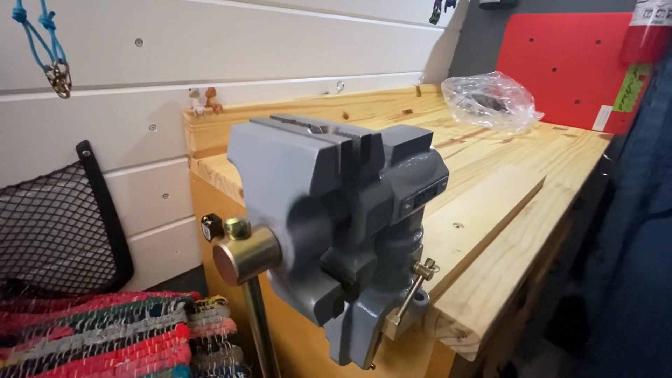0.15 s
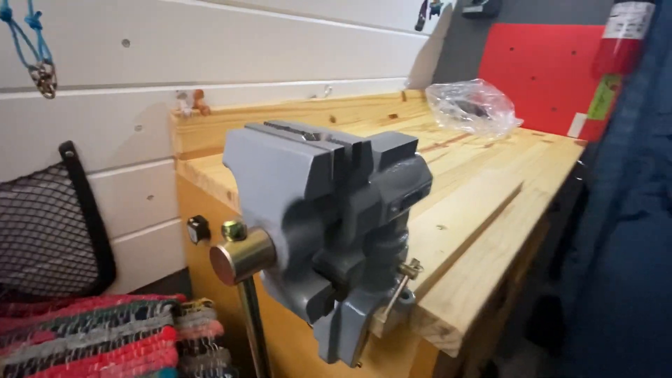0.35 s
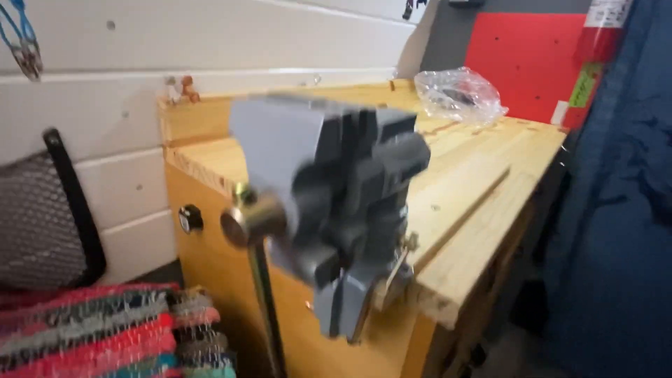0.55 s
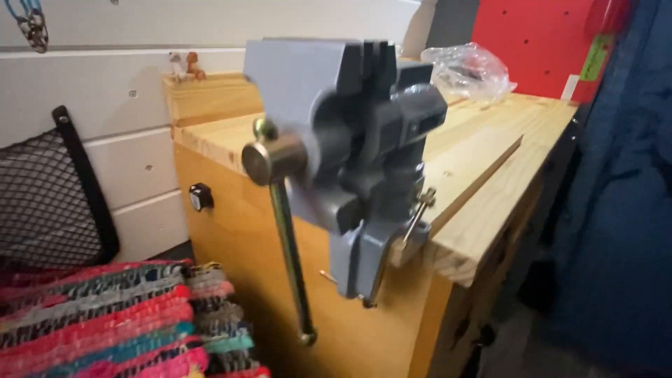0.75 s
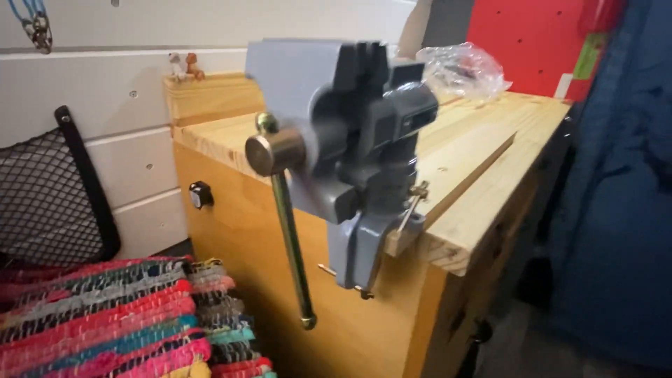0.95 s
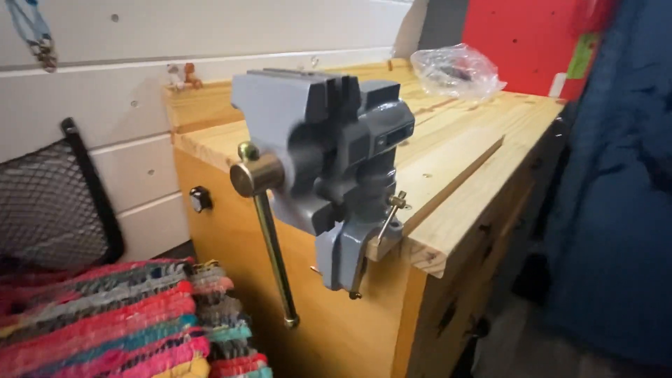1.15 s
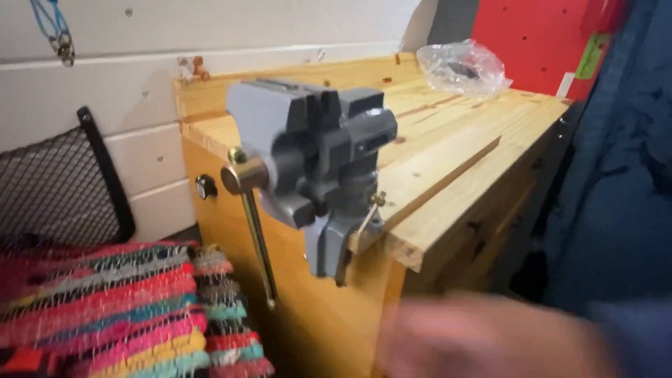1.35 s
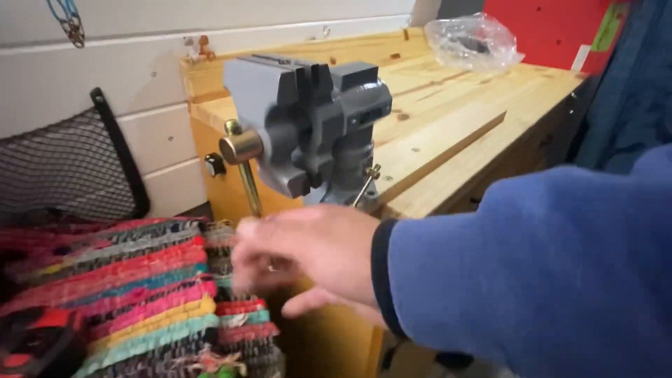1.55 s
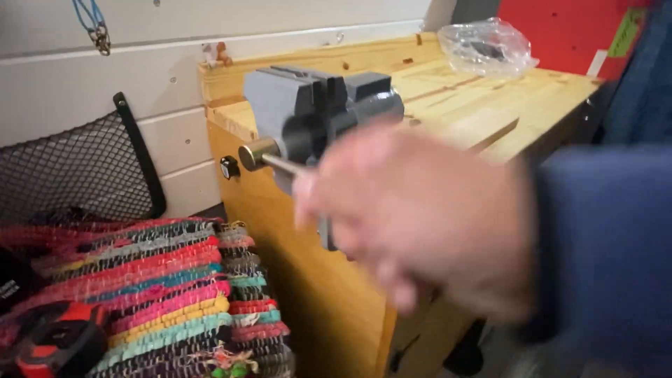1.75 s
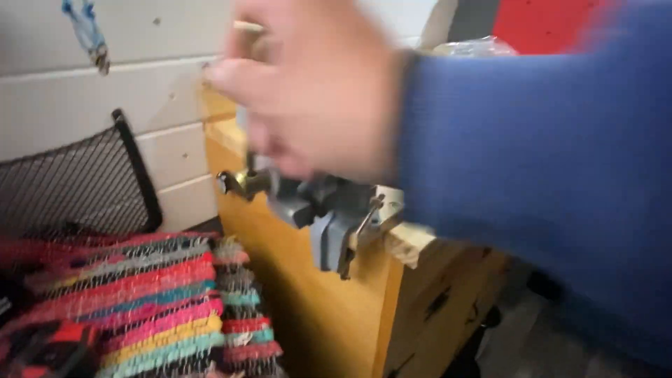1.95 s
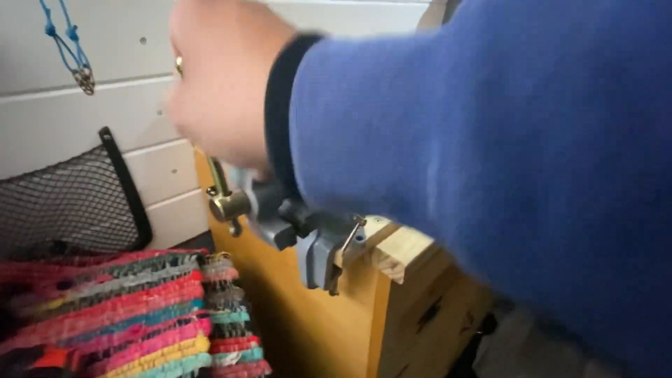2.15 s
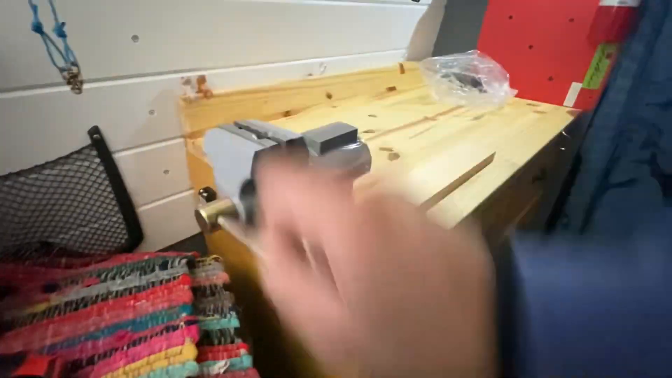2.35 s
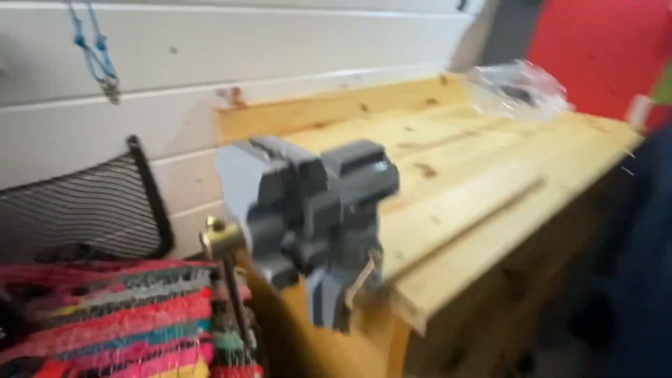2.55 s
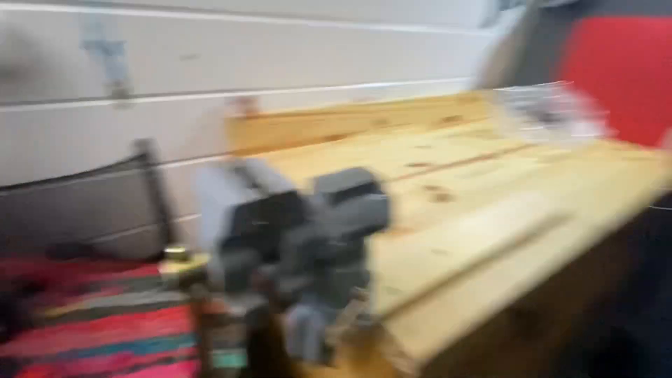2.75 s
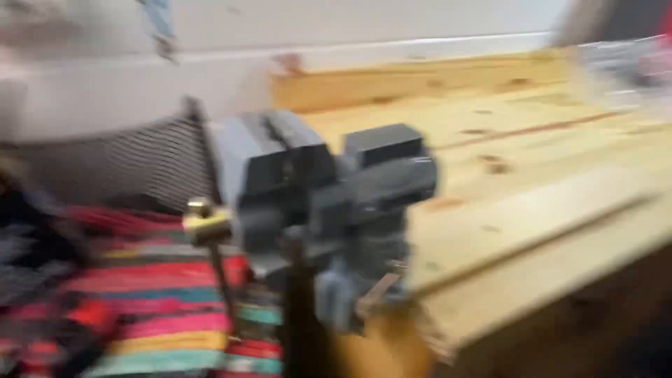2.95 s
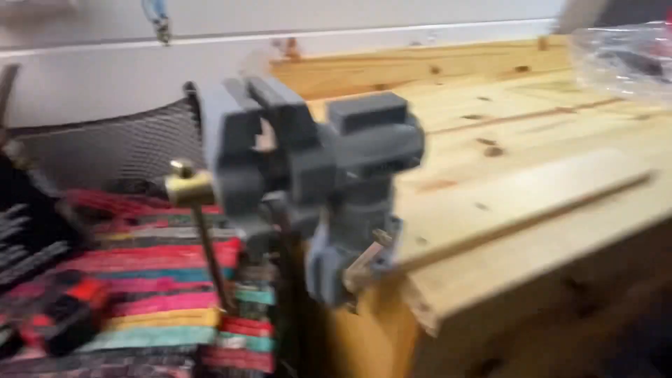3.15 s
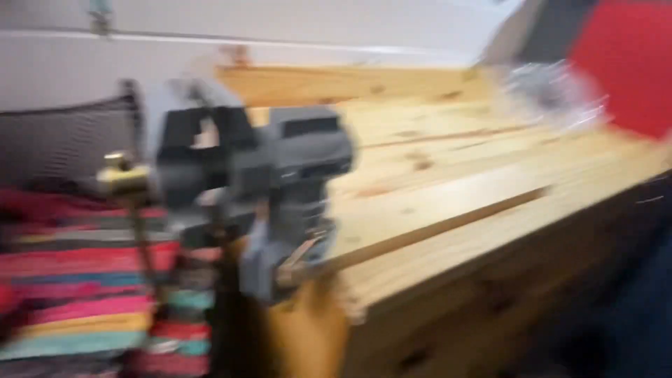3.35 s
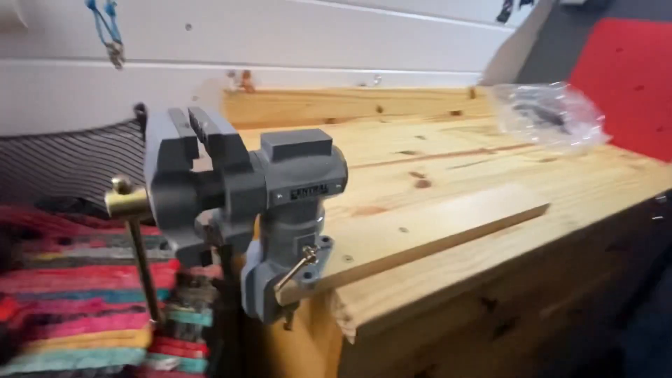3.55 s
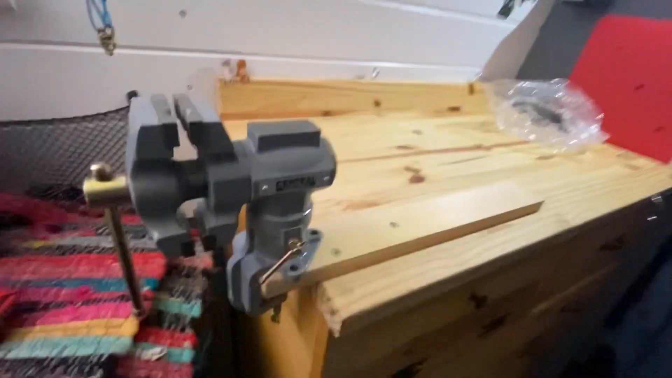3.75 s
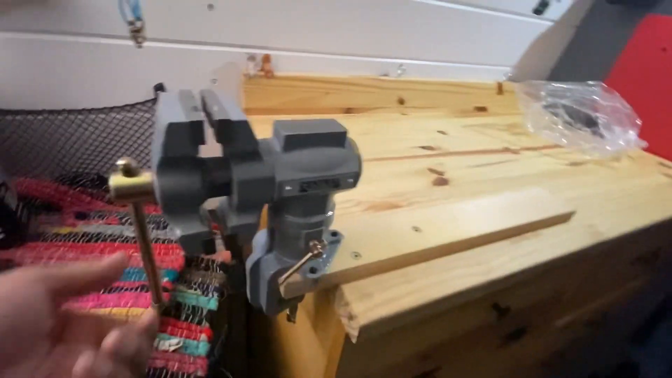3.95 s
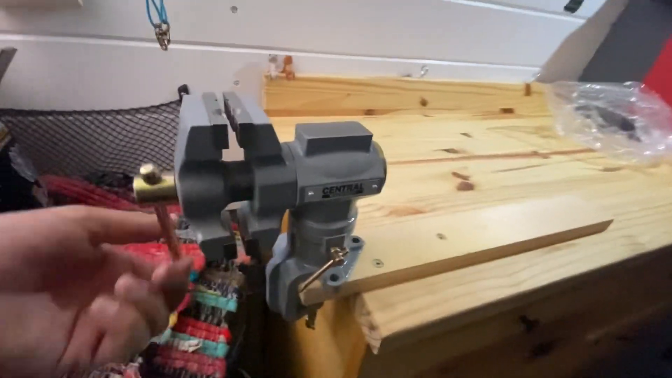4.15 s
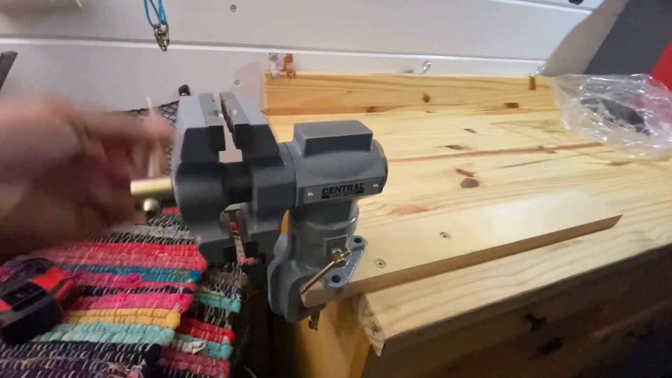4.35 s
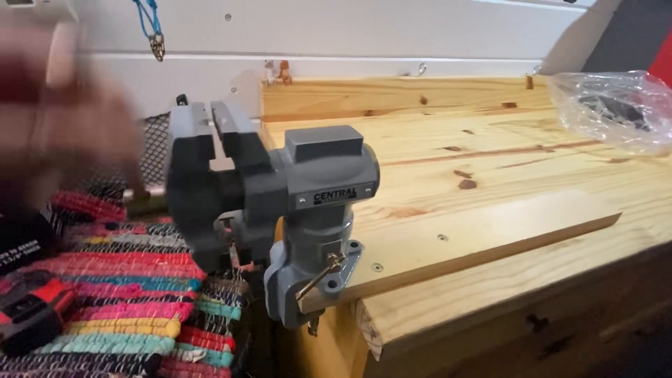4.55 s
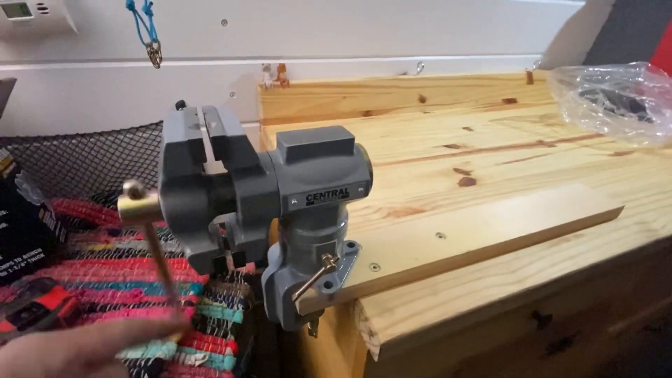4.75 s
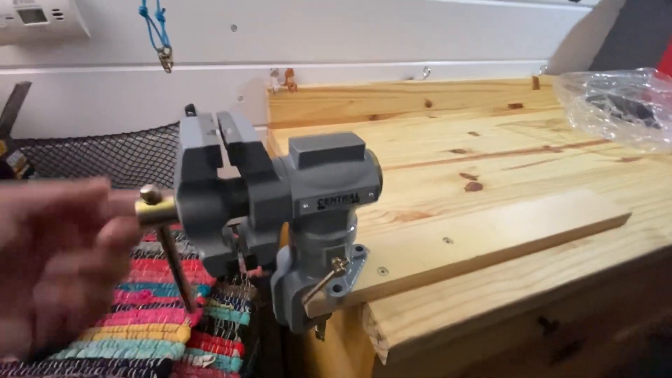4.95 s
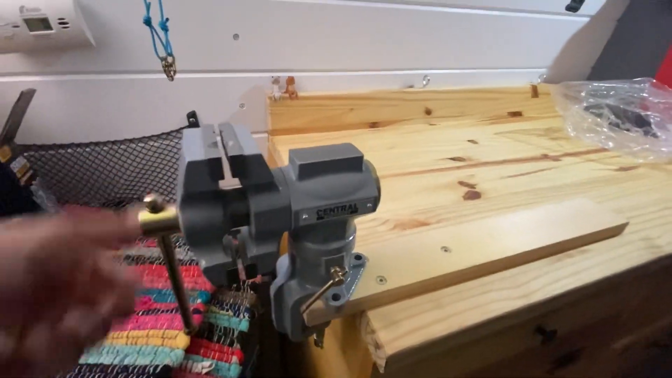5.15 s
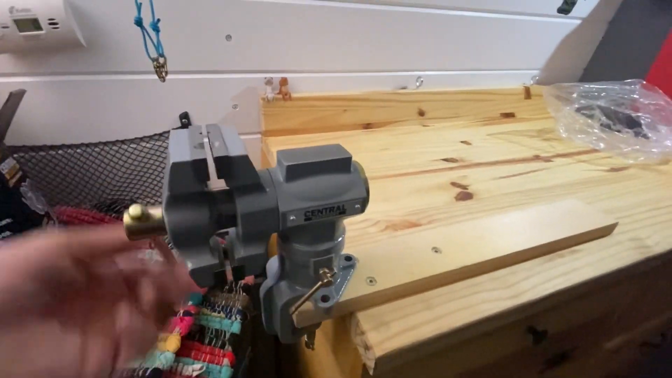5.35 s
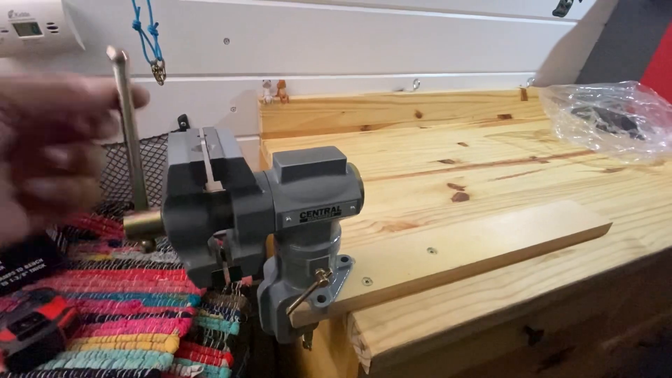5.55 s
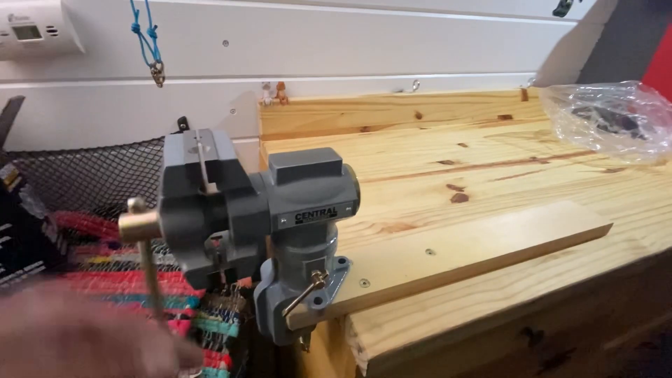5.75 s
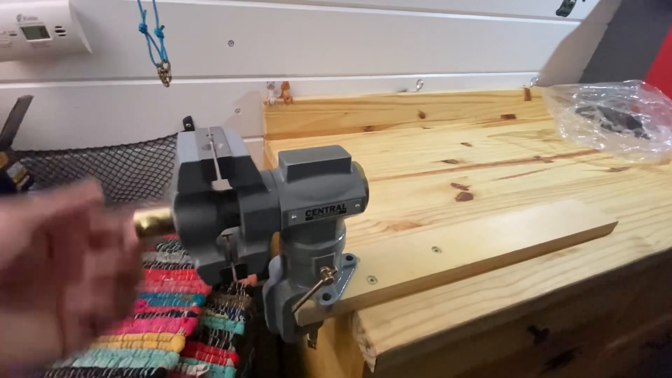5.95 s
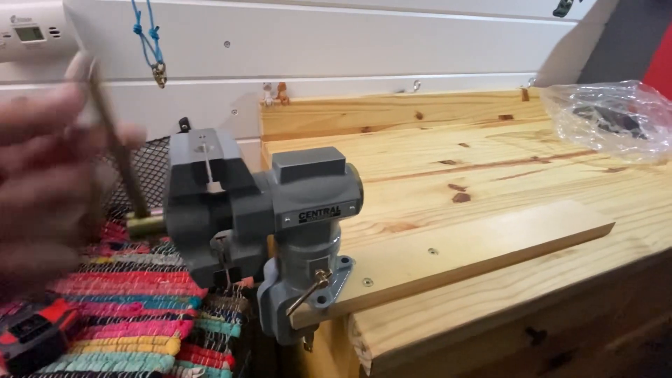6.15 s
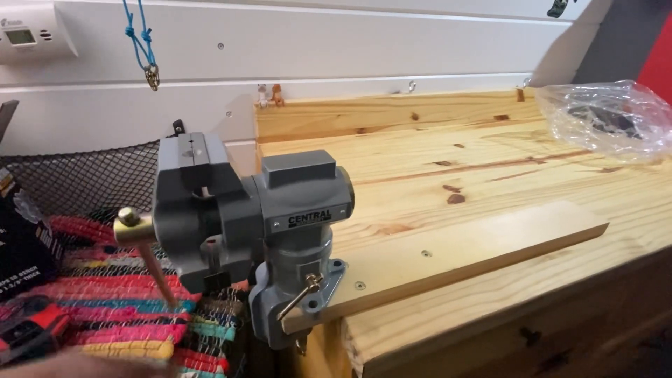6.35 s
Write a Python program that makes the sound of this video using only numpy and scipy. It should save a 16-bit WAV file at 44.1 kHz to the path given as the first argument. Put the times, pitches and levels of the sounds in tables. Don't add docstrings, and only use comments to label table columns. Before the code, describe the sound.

Close stereo pickup of a heavy bench vise being handled. A dull thump and light metal tick lead to a hard ringing clack as the bar falls through its collar. Soft bumps and cloth movement follow, then irregular clinks and wooden knocks as the screw is turned. Rings die almost at once; a low rumble and thin hiss lie underneath in a small room.

```python
import sys
import numpy as np
from scipy import signal
from scipy.fft import rfft, irfft, next_fast_len
from scipy.io import wavfile
from scipy.ndimage import uniform_filter1d

SR = 44100
rng = np.random.default_rng(int(sys.argv[2]) if len(sys.argv) > 2 else 0)


def decibels_to_gain(level_db):
    exponent = np.asarray(level_db, float) / 20
    return 10 ** exponent


def materialize(psi):
    bounded = np.clip(np.atleast_2d(psi).T, -1, 1)
    quanta = np.round(bounded * 32767).astype(np.int16)
    wavfile.write(sys.argv[1], SR, quanta)


N = 281835
LEFT_LAG = 17

# start in seconds, then levels in dB of the first, collar, high and top rings.
CLINKS = [(1.551, -68, -43, -72, -87.5), (1.561, -56, -54, -51.5, -83), (2.1355, -76, -54, -61, -84),
          (2.1459, -74, -55, -80, -83), (2.189, -67.5, -50.5, -59.5, -66), (2.3476, -29, -28, -10, -19.5),
          (2.3504, -40.5, -33.5, -17.5, -23), (2.3972, -47, -43, -49.5, -62), (4.011, -57.5, -71, -73, -85),
          (4.0263, -55, -41, -46.5, -75), (4.5977, -45, -47, -54, -68.5), (4.6638, -77.5, -56, -77, -72),
          (4.748, -72.5, -57.5, -88.5, -95), (4.8675, -35.5, -49, -53.5, -56),
          (4.8814, -39, -35.5, -44, -53), (5.268, -84.5, -56, -92.5, -89), (5.2924, -27, -33.5, -19, -61.5),
          (5.3, -31, -39.5, -31, -45.5), (5.6376, -56.5, -61, -82, -92), (5.6604, -63, -58, -79, -82.5),
          (5.698, -44.5, -43, -45, -59), (5.9141, -54, -40, -40.5, -37), (5.9222, -41.5, -34, -35, -42),
          (6.1118, -65, -61, -97, -107), (6.215, -62, -57.5, -66.5, -82.5)]
# start in seconds, level in dB.
BALL_BLOWS = [
    (2.349, -45.5),
    (4.8815, -58),
    (5.2976, -29),
    (5.698, -60),
    (5.9147, -47),
]
# frequency in Hz, level in dB, 60 dB decay in seconds,
# left-right balance in dB.
LOW_RING = [(5400, -20, .06, -8), (5725, 0, .135, -8), (5800, -13, .1, -8)]
COLLAR_RING = [(4450, -14, .04, -4), (6305, -2, .05, -5), (6660, -2, .08, -5), (6920, -6, .06, -5),
               (7250, -6, .05, -4)]
MIDDLE_RING = [(8330, -6, .08, -3), (8470, -5, .1, -3), (8590, 0, .08, -3)]
HIGH_RING = [(10720, -13, .04, 0), (11160, 0, .075, -2), (11400, -10, .08, -2), (11770, -21, .05, 0)]
TOP_RING = [(13140, 0, .08, 0), (14760, -12, .04, 0)]
BALL_RING = [(13880, 0, .075, 0), (13960, -14, .06, 0)]


def handle():
    s, low_db, collar_db, high_db, top_db = np.transpose(CLINKS)
    middle_db = 0.33 * collar_db + 0.38 * high_db + 0.15 * top_db - 15
    out = ringing(s, low_db + 5, LOW_RING, rise_s=0.0006, free=0.22, grip_s=0.011, chatter=0.22, soft=2.5)
    out += ringing(s, collar_db + 3, COLLAR_RING, rise_s=0.0012, free=0.47, grip_s=0.0028, chatter=0.53,
                   soft=0.96)
    out += ringing(s, middle_db + 10.5, MIDDLE_RING, rise_s=0.0028, free=0.37, grip_s=0.012, chatter=0.7)
    out += ringing(s, high_db + 10, HIGH_RING, rise_s=0.0012, free=0.02, grip_s=0.0041, chatter=0.31,
                   soft=-2.6)
    out += ringing(s, top_db + 7, TOP_RING, rise_s=0.002, free=0.15, grip_s=0.006, chatter=0.4)
    ball_s, ball_db = np.transpose(BALL_BLOWS)
    out += ringing(ball_s, ball_db, BALL_RING, rise_s=0.0013, free=0.4, grip_s=0.012, chatter=0.3)
    bright = signal.butter(2, [3000, 14000], "band", fs=SR, output="sos")
    crack = signal.sosfilt(bright, contact(s, (collar_db + top_db) / 2 + 19, 0.00079))
    rattle = signal.sosfilt(bright, [contact(s, collar_db + 9.5, 0.00906), contact(s, collar_db + 11, 0.009)])
    thin = signal.butter(2, [5200, 15800], "band", fs=SR, output="sos")
    shiver = signal.sosfilt(thin, contact(s, (high_db + top_db) / 2 + 4, 0.017))
    return out + snaps() + shiver + rattle + [decibels_to_gain(-3) * np.roll(crack, LEFT_LAG), crack]


def ringing(times, levels_db, modes, rise_s, free, grip_s, chatter, soft=3):
    out, age = np.zeros((2, N + SR)), np.arange(SR // 2) / SR
    shake = rms_one(uniform_filter1d(rng.standard_normal(N + SR), size=60))
    for s, blow_db, luck in zip(times, levels_db, rng.standard_normal((len(times), len(modes), 3))):
        firm = min(decibels_to_gain(0.15 * (blow_db + 30)), 1)
        loose = np.clip(free * firm ** soft, 0, 1)
        at = int(s * SR)
        for (hz, level_db, t60, lean_db), (phase, extra_db, detune) in zip(modes, luck):
            alive = age[:int(min(1.2 * t60, 0.49) * SR)]
            decay_db = 60 * alive / t60 / np.sqrt(firm)
            swing = (1 - np.exp(-alive * firm / rise_s)) ** 2
            swing = swing * decibels_to_gain(blow_db + level_db + extra_db - decay_db)
            swing = swing * (loose + (1 - loose) * np.exp(-alive / grip_s))
            start = at + int(hz)
            swing = swing * (1 + chatter / np.sqrt(firm) * shake[start:start + len(alive)])
            turns = 2 * np.pi * hz * (1 + 0.002 * detune) * alive + 10 * phase
            trail = 0.72 + (hz < 9500) * detune
            out[0, at:at + len(alive)] += decibels_to_gain(lean_db / 2) * swing * np.sin(turns - trail)
            out[1, at:at + len(alive)] += decibels_to_gain(-lean_db / 2) * swing * np.sin(turns)
    return out[:, :N]


# start in seconds, peak level in dB.
SNAPS = [(1.56, -41), (2.3495, -18.5), (4.0283, -39), (4.0336, -53), (4.5997, -44), (4.8825, -29.5),
         (5.2947, -22), (5.699, -36), (5.9142, -23), (5.9184, -29), (6.215, -52)]


def snaps():
    s, peak_db = np.transpose(SNAPS)
    force = np.zeros(N)
    force[(s * SR).astype(int)] = decibels_to_gain(peak_db + 8) * rng.choice([-1, 1], len(s))
    bright = signal.butter(2, [3600, 13500], "band", fs=SR, output="sos")
    pulse = signal.sosfilt(bright, force + 1e-18)
    return np.array([decibels_to_gain(-2.5) * np.roll(pulse, 3), pulse])


# start in seconds, dull level in dB, hard level in dB,
# length of contact in seconds.
KNOCKS = [(1.552, -40, -46, 0.0022), (1.559, -40, -40.5, 0.0042), (1.609, -48, -53, 0.0073),
          (2.126, -43.5, -48, 0.0058), (2.143, -55, -46, 0.0038), (2.188, -38.5, -37.5, 0.0048),
          (2.206, -42, -47, 0.0022), (2.348, -30, -24.5, 0.0032), (2.354, -40, -36.5, 0.015),
          (2.402, -37, -42, 0.003), (3.269, -46, -54.5, 0.0011), (4.012, -48.5, -50, 0.018),
          (4.028, -55, -43, .001), (4.033, -48.5, -43, 0.0043), (4.501, -63, -80, 0.004),
          (4.597, -45.5, -40.5, 0.0028), (4.606, -43.5, -54, 0.015), (4.701, -47, -61, 0.0037),
          (4.729, -45.5, -55, 0.0033), (4.745, -66, -49, 0.0049), (4.873, -44, -43, 0.0042),
          (4.885, -49.5, -39, 0.0036), (5.293, -39, -32.5, 0.0051), (5.304, -35, -47.5, 0.015),
          (5.36, -48.5, -49, 0.0041), (5.585, -52.5, -56.5, 0.0022), (5.64, -53.5, -51, 0.0047),
          (5.697, -37, -32.5, 0.0035), (5.705, -42.5, -43.5, 0.02), (5.806, -67, -71, 0.003),
          (5.914, -37.5, -35.5, 0.005), (5.927, -39, -38, 0.0052), (5.97, -40.5, -39, 0.0018),
          (6.115, -55.5, -69, 0.0033), (6.214, -58.5, -44.5, .002), (6.222, -42.5, -49, 0.0085),
          (6.273, -51.5, -55.5, 0.0054)]
# frequency in Hz, level in dB, 60 dB decay in seconds,
# left-right balance in dB.
BODY = [(527.3, -4, 0.039, -3), (757, 4.5, 0.014, -4.5), (1057, -1.5, 0.023, -9), (1340, 3.5, 0.011, -4.5)]
JAWS = [(1635, -6, 0.033, 0), (2012, 0.5, 0.011, 7.5), (2310, -2.5, 0.01, 4), (2840, -5, 0.012, -3.5),
        (3310, -3, 0.0063, -8.5), (4360, 4, 0.0042, -8.5)]


def casting():
    s, dull_db, hard_db, spread_s = np.transpose(KNOCKS)
    shared = struck(contact(s, dull_db - 4.5, spread_s), BODY)
    shared += struck(contact(s, hard_db - 3.5, 2.1 * spread_s), JAWS)
    shared += struck(contact(s, dull_db - 17.5, 2.2 * spread_s), BENCH + DRAWER[:2])
    apart = struck(contact(s, dull_db - 5, 3 * spread_s), BODY + JAWS[:3])[1]
    return shared + apart * decibels_to_gain(np.array([[-3], [0]])) + lever()


# start in seconds, lower pair in dB, upper pair in dB,
# rise in seconds.
LEVER_TAPS = [
    (5.9545, -70, -95, .004),
    (5.971, -78, -66, .004),
    (6.05, -74, -90, .02),
    (6.31, -72, -95, .03),
]
# frequency in Hz, level in dB, 60 dB decay in seconds, left-right balance in dB.
LEVER = [(2010, -3, .7, 4), (2083, 0, .8, 4), (3285, -2, .35, -2), (3360, 0, .35, -2)]


def lever():
    out, age = np.zeros((2, N + SR)), np.arange(SR // 2) / SR
    for s, lower_db, upper_db, rise_s in LEVER_TAPS:
        at = int(s * SR)
        for k, (hz, level_db, t60, lean_db) in enumerate(LEVER):
            pair_db = (lower_db, upper_db)[k // 2]
            swing = (1 - np.exp(-age / rise_s)) * decibels_to_gain(pair_db + level_db - 60 * age / t60)
            waver = rms_one(uniform_filter1d(rng.standard_normal(len(age)), size=300))
            tone = swing * (1 + 0.5 * waver) * np.sin(2 * np.pi * hz * age + rng.uniform(0, 2 * np.pi))
            out[:, at:at + len(age)] += decibels_to_gain(np.array([[0.5], [-0.5]]) * lean_db) * tone
    return out[:, :N]


# time of the peak in seconds, peak level in dB, rise in
# seconds, fall in seconds, tightness in dB.
EFFORTS = [(1.578, -42.5, 0.027, 0.15, -9), (2.146, -58.5, .09, 0.071, -6),
           (2.207, -40.5, 0.055, 0.067, -2), (2.367, -30.5, 0.027, 0.088, -11),
           (3.271, -61, 0.035, 0.1, -0.5), (4.034, -58, 0.03, 0.12, -4), (4.279, -56, 0.069, 0.11, -9),
           (4.345, -57.5, 0.035, 0.2, -3), (4.508, -51, .015, 0.053, -2), (4.621, -46, 0.053, 0.066, -15),
           (4.715, -45, 0.054, 0.073, -4), (4.891, -52, .04, 0.075, -7.5), (5.312, -53, 0.0095, 0.33, -5),
           (5.434, -53, 0.12, 0.099, -32), (5.596, -48, 0.12, 0.031, -18), (5.768, -40.5, 0.091, 0.063, -9),
           (5.927, -38, 0.0079, 0.098, -9), (6.16, -57, 0.074, 0.091, -13), (6.275, -49, 0.11, 0.12, -6)]
# frequency in Hz, level in dB,
# 60 dB decay in seconds, left-right balance in dB.
BENCH = [(160, -9, .05, 1), (195, -5, .055, 1), (245, 0, .085, 0), (288, -3, .07, -1)]
DRAWER = [(378, 0, .06, -2), (490, -3, .04, -2), (580, -7, .04, -2), (730, -6, .05, -3),
          (1030, -9, .04, -3), (1320, -13, .03, -3)]


def bench():
    s, peak_db, rise_s, fall_s, tight_db = np.transpose(EFFORTS)
    efforts = swells(s - 0.01, peak_db, rise_s, fall_s)
    slips_per_s = 360 * decibels_to_gain(4 * drift(20))
    slips = (rng.random(N) < slips_per_s / SR) * rng.standard_normal(N)
    soft = signal.sosfilt(signal.butter(2, 2500, fs=SR, output="sos"), slips)
    out = np.zeros((2, N))
    for modes, level_db in ((BENCH, np.full(len(s), -1.0)), (DRAWER, tight_db + 0.5)):
        steady = struck(soft, modes)
        out += struck(soft * (decibels_to_gain(level_db) @ efforts), modes) / np.sqrt(np.mean(steady ** 2))
    return out


# start in seconds, peak level in dB, frequency in Hz, 60 dB decay in seconds.
WORKTOP_THUDS = [(1.563, -26, 212, 0.045), (1.615, -40, 300, 0.095), (2.133, -47.5, 368, 0.14),
                 (2.154, -36.5, 376, 0.06), (2.197, -37.5, 290, 0.11), (2.358, -31.5, 249, 0.059),
                 (2.402, -37.5, 302, 0.17), (2.543, -51, 197, 0.1), (2.663, -48.5, 350, 0.075),
                 (3.276, -49.5, 172, 0.12), (3.341, -50.5, 176, 0.11), (4.038, -47.5, 229, 0.078),
                 (4.506, -47.5, 287, 0.19), (4.574, -44.5, 243, 0.17), (4.612, -35, 241, 0.16),
                 (4.696, -41, 276, 0.1), (4.728, -33.5, 211, 0.039), (4.876, -41.5, 232, 0.1),
                 (5.307, -38.5, 218, 0.11), (5.367, -45.5, 193.7, 0.25), (5.421, -43, 232.3, 0.087),
                 (5.549, -49, 254.6, 0.18), (5.58, -39.5, 251, 0.18), (5.711, -40, 249.7, 0.6),
                 (5.745, -39.5, 191, .22), (5.772, -38, 202, 0.14), (5.805, -42, 287, 0.11),
                 (5.923, -30, 252.6, 0.095), (5.946, -44.5, 261.3, 0.21), (6.228, -42, 283, 0.12),
                 (6.27, -42.5, 247, 0.11)]
CUPBOARD_THUDS = [(1.564, -29.5, 81, 0.12), (1.738, -54, 73.5, 0.22), (1.974, -52, 97.4, 0.26),
                  (2.143, -50, 100, 0.37), (2.366, -33, 79.7, 0.32), (2.666, -46, 89.4, 0.47),
                  (2.789, -45.5, 93.4, 0.47), (4.701, -54, 86.7, 0.3), (5.712, -54, 93, 0.3),
                  (5.925, -45.5, 88.3, 0.51)]
CASTING_THUDS = [(1.561, -45.5, 858, 0.11), (1.609, -45.5, 584, 0.087), (2.196, -44, 720, 0.092),
                 (2.206, -38, 728, 0.096), (2.354, -27.5, 1024, 0.035), (2.403, -44, 746, 0.05),
                 (4.036, -49, 586, 0.056), (4.607, -46, 732, 0.071), (4.701, -46.5, 1060, 0.052),
                 (4.729, -54, 636, 0.043), (4.876, -46, 995, 0.076), (5.305, -42.5, 720, 0.046),
                 (5.702, -43.5, 700, 0.067), (5.805, -51, 717, 0.043), (5.919, -42, 1310, 0.065),
                 (5.9545, -31.5, 2025, 0.027), (5.97, -38.5, 741, 0.069), (6.22, -44.5, 1244, 0.076),
                 (6.273, -48, 1040, 0.043)]


def thuds():
    out = np.zeros((2, N + SR))
    for s, peak_db, hz, t60 in WORKTOP_THUDS + CUPBOARD_THUDS + CASTING_THUDS:
        at, age = int(s * SR), np.arange(int(np.clip(t60, 0.03, 0.45) * SR)) / SR
        build_up = 1 - np.exp(-age * hz / 0.4)
        swing = build_up * decibels_to_gain(peak_db + 1.5 - 60 * age / np.clip(t60, 0.02, 0.45))
        sagging = age + 0.00029 * (1 - np.exp(-age / 0.0089))
        turns = 2 * np.pi * hz * sagging + rng.uniform(0, 2 * np.pi)
        trail = 0.71 * np.sqrt(hz / 245)
        out[:, at:at + len(age)] += swing * np.sin([turns - trail, turns])
    return out[:, :N]


# start in seconds, peak level in dB, centre frequency in Hz.
TICKS = [(0.1218, -43.5, 1200), (.4, -64, 2570), (0.766, -59, 1890), (2.5054, -46, 2050),
         (2.539, -36.5, 695), (2.6644, -53, 2310), (2.7761, -53, 8140), (2.8625, -44.5, 1560),
         (3.212, -75, 14100), (3.232, -72, 14000), (3.2682, -48, 2210), (3.289, -56, 2410),
         (3.6147, -62.5, 8140), (3.697, -53.5, 3660), (4.501, -52.5, 800), (4.574, -56, 1510),
         (4.6643, -57, 1895), (4.7299, -39.5, 1520), (5.661, -52, 4500), (5.829, -67, 3320),
         (5.64, -53.5, 2600), (5.807, -52, 803), (6.274, -43.5, 900)]


def ticks():
    out = np.zeros((2, N))
    for s, peak_db, hz in TICKS:
        at = int(s * SR)
        snap = rng.standard_normal((2, 400)) * np.exp(-np.arange(400) / SR / 0.0015)
        wide = signal.butter(2, [hz / 2.5, min(2 * hz, 16000)], "band", fs=SR, output="sos")
        out[:, at:at + 400] += decibels_to_gain(peak_db + 4) * signal.sosfilt(wide, snap + 0.21 * snap[0])
    return out


# time of the peak in seconds, peak level in dB, length in seconds.
BRUSHES = [(0.14, -88.5, 0.22), (0.964, -79.5, 0.045), (1.418, -78, 0.59), (1.716, -76.5, 0.081),
           (1.896, -80, 0.11), (2.006, -84, 0.14), (2.172, -87.5, 0.28), (2.343, -63.5, 0.048),
           (2.64, -78, 0.48), (2.965, -74, 0.075), (3.081, -78.5, 0.07), (3.274, -65.5, 0.028),
           (3.426, -71, 0.07), (3.649, -75, 0.094), (4.096, -84.5, 0.07), (4.283, -77, 0.06),
           (4.647, -76.5, 0.11), (5.179, -85, 0.083), (5.414, -87, 0.086), (5.656, -84, 0.11),
           (5.75, -74, 0.099), (6.075, -100.5, 0.084),]
# frequency in Hz, density in dB per Hz.
RUSTLE = [(1760, -69), (3000, -23.5), (3570, -20), (4320, -16), (5180, -14), (8340, -7.5), (12700, -13.5),
          (15000, -8), (16000, -12)]


def sleeve():
    s, peak_db, length_s = np.transpose(BRUSHES)
    [air_db] = in_time(DRAUGHT)
    brushing = swells(s, peak_db, 0.76 * length_s, length_s).max(axis=0)
    brushing = brushing + decibels_to_gain(2 * air_db + 32)
    return decibels_to_gain(9.5) * brushing * banded_noise(RUSTLE, patchy_db=3)


# time of the peak in seconds, peak level in dB, length in seconds, centre
# frequency in Hz.
FOLDS = [
    (0.854, -69.5, 0.38, 2020),
    (.97, -69.5, 0.056, 4800),
    (1.451, -73.5, 0.2, 4940),
    (3.256, -65, 0.035, 2470),
    (3.65, -78.5, .1, 3990),
]


def folds():
    s, peak_db, length_s, centre_hz = np.transpose(FOLDS)
    out = np.zeros((2, N))
    for gain, hz in zip(swells(s, peak_db, length_s, length_s), centre_hz):
        band = signal.butter(2, [hz / 1.2, hz * 1.2], "band", fs=SR, output="sos")
        out += gain * rms_one(signal.sosfilt(band, rng.standard_normal((2, N))))
    return out


# time in seconds, level in dB, tilt towards the deepest band in dB.
RUMBLE = [(0.0, -58.5, -1), (0.5, -54.5, -3.5), (0.76, -48, -16), (0.96, -44.5, -45), (1.2, -50.5, -20),
          (1.46, -46, -20), (1.94, -49.5, -11), (2.3, -56.5, 10), (2.54, -51, -3.5), (3.0, -58, 0.5),
          (3.5, -62, -1), (3.8, -70, 12.5), (4.2, -60.5, 0), (4.48, -64, 0.5), (4.8, -67, 2),
          (5.2, -74.5, -0.5), (5.5, -62.5, 0.5), (6.39, -71, 4)]
# frequency in Hz, density in dB per Hz.
DEEP = [(15, -48.5), (30, -25.5), (45, -3), (56, -8), (75, -39.5)]
HUM = [(38, -24.5), (56, -11.5), (67, -2), (82, -5), (110, -41.5)]
UPPER = [(60, -40), (85, -4), (105, 0), (140, -8), (185, -21), (260, -30), (400, -60)]


def rumble():
    level_db, deep_db = in_time(RUMBLE)
    s, peak_db, rise_s, fall_s, _ = np.transpose(EFFORTS)
    thump = swells(s + 0.016, peak_db, 1.4 * rise_s, 2 * fall_s).max(axis=0)
    deep = np.hypot(decibels_to_gain(level_db + deep_db), decibels_to_gain(-18) * thump)
    hum = np.hypot(decibels_to_gain(level_db - 0.04), decibels_to_gain(-14.5) * thump)
    upper = np.hypot(decibels_to_gain(level_db + 0.3 * deep_db - 1.5), decibels_to_gain(-9) * thump)
    out = deep * banded_noise(DEEP, patchy_db=3) + hum * banded_noise(HUM, patchy_db=2)
    return out + upper * banded_noise(UPPER, patchy_db=3)


# time in seconds, level in dB.
DRAUGHT = [(0.0, -64.5), (0.456, -66.5), (1.0, -64.5), (1.6, -61), (2.1, -63.5), (2.66, -63), (3.3, -73.5),
           (3.83, -73), (4.2, -76), (4.9, -75), (5.0, -86.5), (5.27, -80.5), (5.5, -73.5), (5.87, -74),
           (6.08, -69.5), (6.39, -70)]
# frequency in Hz, density in dB per Hz.
AIR = [(88, -27), (150, -5.5), (186, -7.5), (235, -10.5), (297, -11.5), (564, -14), (955, -14), (1210, -19),
       (2040, -23.5), (2390, -27), (7530, -39), (9710, -52.5), (13500, -41.5), (15800, -43)]


def air():
    [air_db] = in_time(DRAUGHT)
    return decibels_to_gain(air_db + 4.5) * banded_noise(AIR, patchy_db=1.2)


# frequency in Hz, density in dB per Hz.
HISS = [(100, -31.5), (300, -5), (1000, 2), (2500, -24.5), (5400, -14.5), (7700, -13.5), (8100, -6.5),
        (8900, -10.5), (9800, -10.5), (10500, -23.5), (12000, -28.5), (16000, -58.5)]


def hiss():
    return decibels_to_gain(-75.5) * banded_noise(HISS, patchy_db=1.2)


def room(x):
    t60_s, wall_cut_hz = 0.25, 6000
    size = next_fast_len(N + SR)
    z = np.exp(-2j * np.pi * np.fft.rfftfreq(size))
    dull = np.exp(-2 * np.pi * wall_cut_hz / SR)
    wall = (1 - dull) / (1 - dull * z)
    heard = np.zeros((2, len(z)), complex)
    for k, lag in enumerate((rng.uniform(0.0044, 0.019, size=16) * SR).astype(int)):
        round_trip = decibels_to_gain(-60 * lag / SR / t60_s) * wall * z ** lag
        heard[k % 2] += (-1) ** (k // 2) * round_trip / (1 - round_trip)
    return irfft(heard * rfft(x.mean(axis=0), size), size)[:, :N]


def contact(times, levels_db, spreads_s):
    length = int(0.12 * SR)
    age = np.arange(length) / SR / np.clip(np.reshape(spreads_s, (-1, 1)), 0.0002, 0.02)
    rattles = rng.standard_normal((len(times), length)) ** 3 * np.sqrt(age) * np.exp(-age)
    force = np.zeros(N + length)
    for s, level_db, rattle in zip(times, levels_db, rattles):
        at = int(s * SR)
        force[at:at + length] += decibels_to_gain(level_db) * rattle / np.sqrt(np.sum(rattle ** 2))
    return force[:N]


def struck(force, modes):
    out = np.zeros((2, N))
    for k, (hz, level_db, t60, lean_db) in enumerate(modes):
        r, w = decibels_to_gain(-60 / (max(t60, 0.005) * SR)), 2 * np.pi * hz / SR
        tone = signal.lfilter([0, np.sin(w)], [1, -2 * r * np.cos(w), r * r], force + 1e-18)
        tone = (-1) ** k * tone
        out[0] += decibels_to_gain(level_db + lean_db / 2) * np.roll(tone, LEFT_LAG)
        out[1] += decibels_to_gain(level_db - lean_db / 2) * tone
    return out


def swells(times, peaks_db, rises_s, falls_s):
    times, peaks_db, rises_s, falls_s = [np.reshape(c, (-1, 1)) for c in (times, peaks_db, rises_s, falls_s)]
    age = np.arange(0, N, 16) / SR - times
    span = np.where(age < 0, -rises_s, falls_s)
    gain = decibels_to_gain(peaks_db - np.minimum(20 * age / span, 200))
    return np.repeat(gain, 16, axis=1)[:, :N]


# frequency in Hz, correlation from 0 to 1.
LIKENESS = [(30, 0.86), (90, 1), (150, 0.3), (290, 0.66), (640, 0.094), (1410, .12), (3100, 0.65),
            (6820, 0.56), (9800, 0.3), (15000, 1)]
# frequency in Hz, left-right balance in dB.
LEAN = [(60, 0), (110, 1.9), (200, -3), (380, -1), (700, -3), (1290, -3), (2380, -1.5), (4400, -6.5),
        (8120, -6), (15000, -2.5)]


def banded_noise(spectrum, patchy_db):
    size = next_fast_len(N)
    hz = np.maximum(np.fft.rfftfreq(size, 1 / SR), 1)
    mid, side = rfft(rng.standard_normal((2, size)))
    alike = at_hz(LIKENESS, hz)
    pair = np.sqrt(1 + alike) * mid + np.sqrt(1 - alike) * side * [[1], [-1]]
    lean = decibels_to_gain(at_hz(LEAN, hz) * np.array([[0.5], [-0.5]]))
    pair = pair * lean * decibels_to_gain(at_hz(spectrum, hz))
    lowest_hz, highest_hz = spectrum[0][0], spectrum[-1][0]
    octave = np.log2(hz / lowest_hz)
    out = np.zeros((2, N))
    for k in range(int(np.log2(highest_hz / lowest_hz)) + 2):
        band = irfft(pair * np.clip(1 - np.abs(octave - k), 0, 1), size)[:, :N]
        out += band * decibels_to_gain(patchy_db * drift(9))
    return rms_one(out)


def drift(rate):
    r = np.exp(-80 * np.pi * rate / SR)
    slow = signal.lfilter([1], [1, -2 * r, r * r], rng.standard_normal(N // 40 + 2002))[2000:]
    return np.interp(np.arange(N) / 40, np.arange(len(slow)), rms_one(slow))


def rms_one(x):
    return x / np.sqrt(np.mean(x ** 2) + 1e-20)


def in_time(rows):
    s, *columns = np.transpose(rows)
    return [np.interp(np.arange(N) / SR, s, c) for c in columns]


def at_hz(points, hz):
    points_hz, values = np.transpose(points)
    return np.interp(np.log(hz), np.log(points_hz), values)


def scene():
    vise = handle() + casting() + bench() + ticks()
    near = vise + decibels_to_gain(-14) * room(vise) + thuds()
    return near + sleeve() + folds() + rumble() + air() + hiss()


def top_cut(x):
    return signal.sosfilt(signal.butter(12, 15900, fs=SR, output="sos"), x)


def record(dry):
    dry = signal.sosfilt(signal.cheby2(16, 50, 16200, fs=SR, output="sos"), dry)
    mid, side = (dry[0] + dry[1]) / 2, (dry[0] - dry[1]) / 2
    below_treble = signal.butter(10, 12300, fs=SR, output="sos")
    side = 0.1 * side + 0.9 * signal.sosfiltfilt(below_treble, side)
    return top_cut(np.array([mid + side, mid - side]))


dry = scene()
out = record(dry)
materialize(out)
```